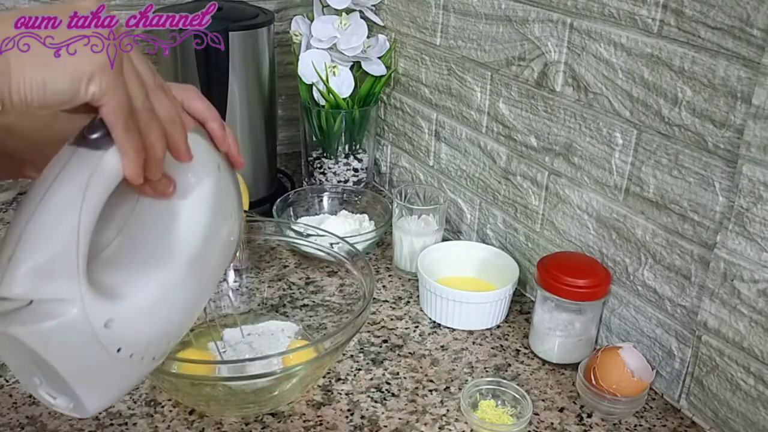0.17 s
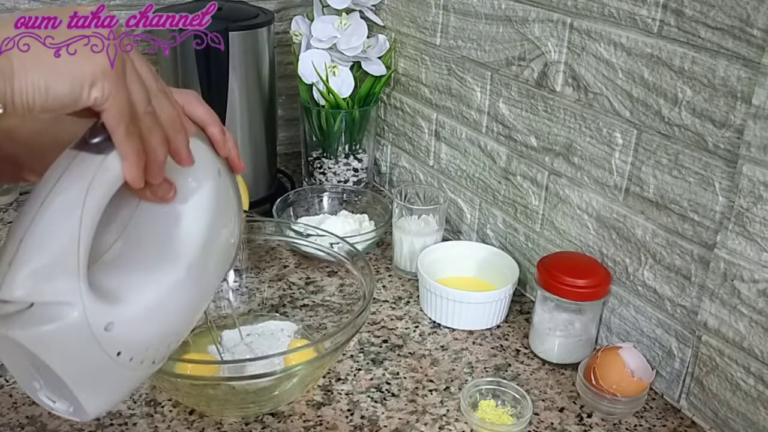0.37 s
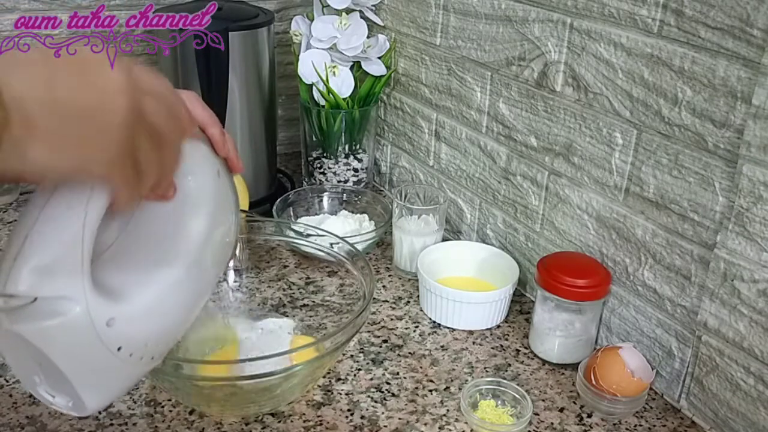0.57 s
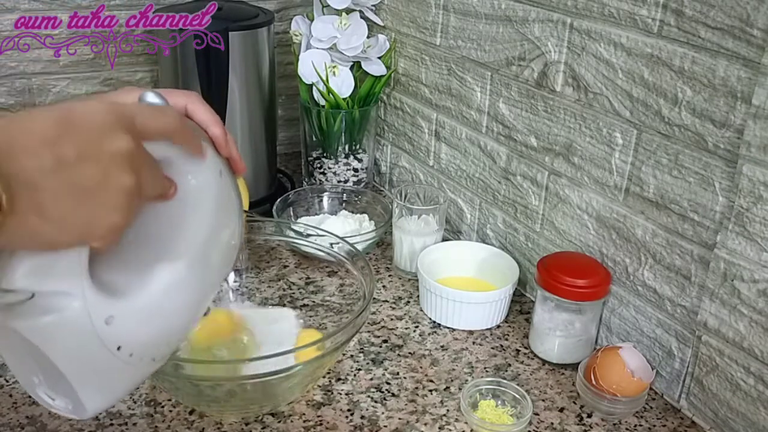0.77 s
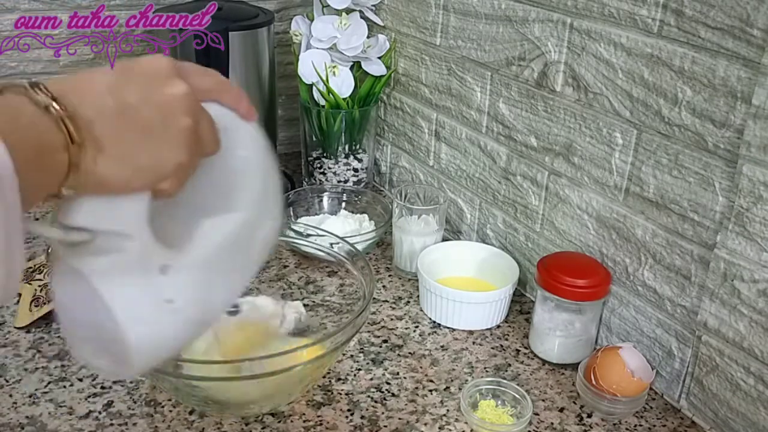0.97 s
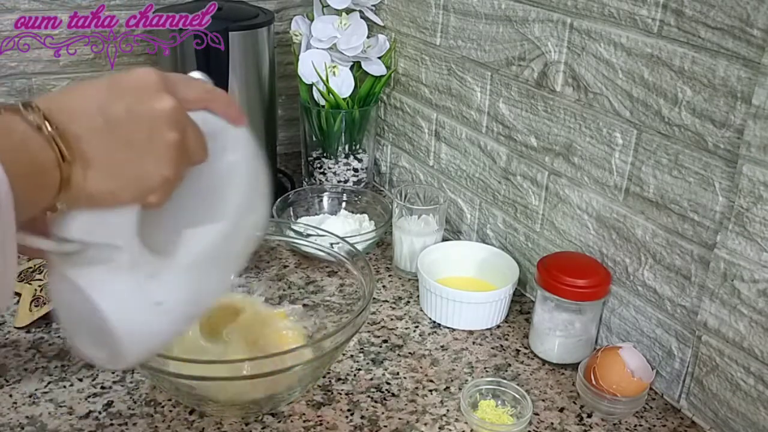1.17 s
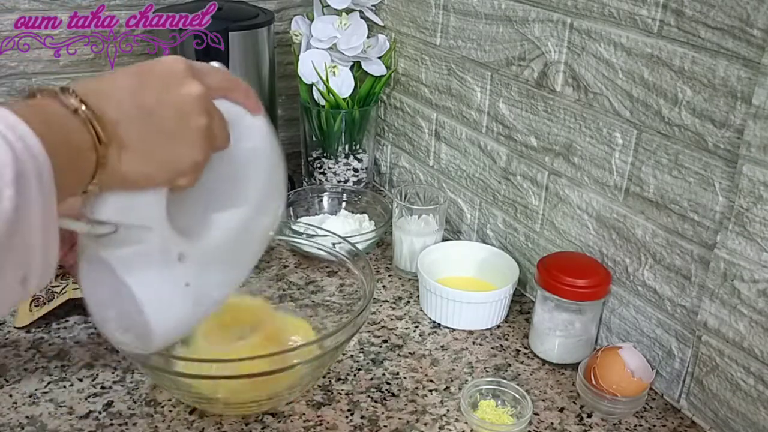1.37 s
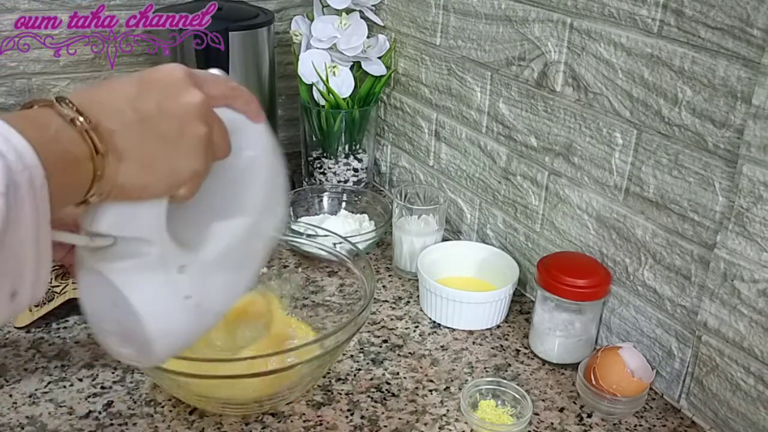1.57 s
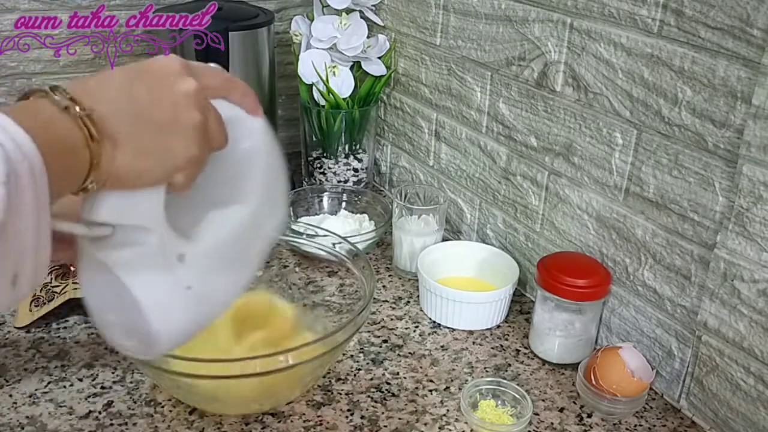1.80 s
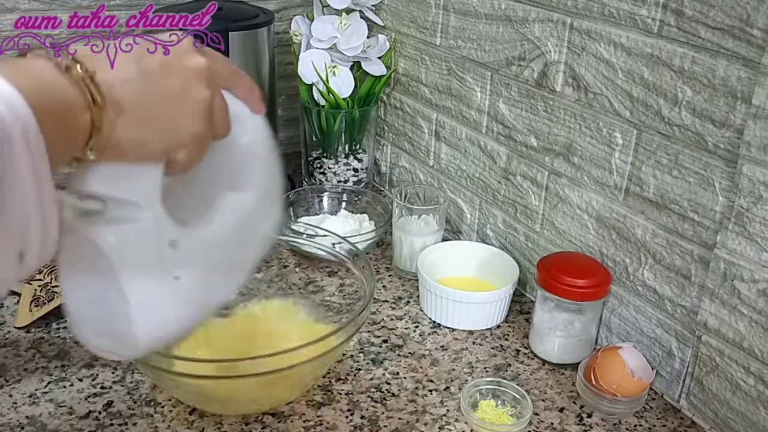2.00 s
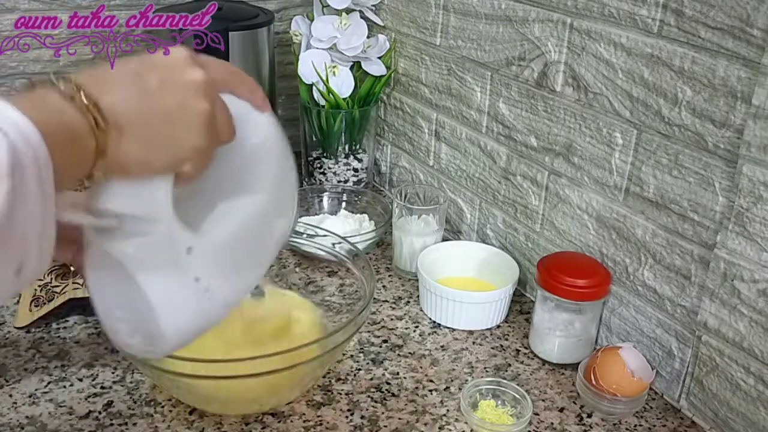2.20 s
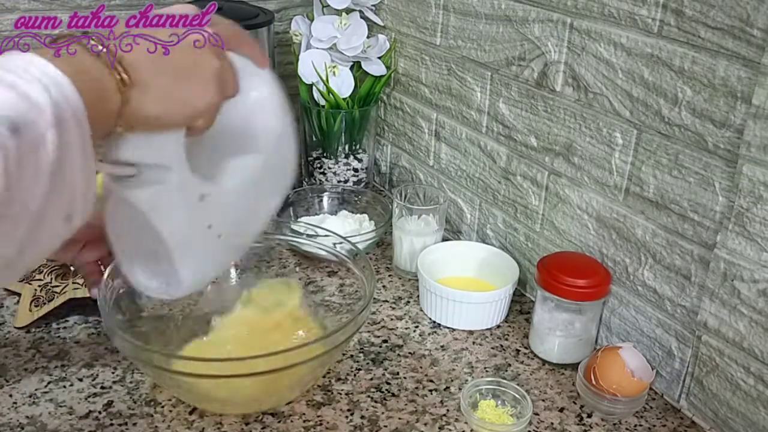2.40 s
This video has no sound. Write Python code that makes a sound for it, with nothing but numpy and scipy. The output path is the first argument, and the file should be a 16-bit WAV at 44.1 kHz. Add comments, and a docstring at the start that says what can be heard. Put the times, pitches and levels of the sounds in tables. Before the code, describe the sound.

An electric hand mixer in a home kitchen: sharp switch clicks with echo, a quick rising throbbing whine and roar, then an abrupt drop to a quieter steady full-speed whir with bright little metallic jingles.

```python
"""A hand mixer's motor spins up with a throbbing whine, then an edit jumps to full speed at a lower level.
The motor is pulsing noise plus tones that follow the shaft speed. Before it, a switch clicks as short
cracks of noise with an echo. Small metal parts jingle as ringing tones: singly at first, then in two bursts
at full speed. A few soft low bumps and the kitchen's room tone and mains hum complete the scene."""
import sys
import numpy as np
from scipy import signal
from scipy.fft import rfft, irfft
from scipy.io import wavfile
from scipy.ndimage import uniform_filter1d

SR = 44100
rng = np.random.default_rng(int(sys.argv[2]) if len(sys.argv) > 2 else 0)


def natural_amplitude(level_db):
    """Convert a level in decibels to a linear amplitude factor, elementwise."""
    exponent = np.asarray(level_db, float) / 20
    return 10 ** exponent


def transcribe(u):
    """Save the signal u as a 16-bit wav file named by the first command-line argument.

    u: samples, shape (n,) or (channels, n), limited to [-1, 1]; the rate is SR.
    q: integer samples, one column per channel.
    """
    v = np.clip(np.atleast_2d(u).T, -1, 1)
    q = np.round(v * 32767).astype(np.int16)
    wavfile.write(sys.argv[1], SR, q)


N = 108045  # length in samples


def evened(x):
    """Scales a sound to an rms of 1."""
    return x / np.sqrt(np.mean(x ** 2) + 1e-20)


def read(points, hz):
    """Reads a curve between its points, along a logarithmic pitch axis."""
    point_hz, value = np.transpose(points)
    return np.interp(np.log(hz + 1), np.log(point_hz + 1), value)


def over_time(table):
    """Turns each column after start_s into a curve with one value per sample."""
    start_s, *columns = np.transpose(table)
    return [np.interp(np.arange(N) / SR, start_s, column) for column in columns]


def add(mix, start_s, sound):
    """Adds a sound to the mix at its start time, cutting off what runs past the end."""
    part = mix[round(start_s * SR):][:len(sound)]
    part += sound[:len(part)]


def drift(per_s):
    """Random wandering of roughly unit size: straight lines between per_s random points a second."""
    return np.interp(np.arange(N) / SR * per_s, np.arange(400), rng.standard_normal(400))


def colour(x, spectrum, patchy_db):
    """Gives x a spectrum whose strength varies in random patches of time and pitch, at an rms of 1."""
    hz, _, z = signal.stft(x, SR, nperseg=1024, noverlap=768)
    patches = rng.standard_normal(z.shape[::-1]).T
    patches = uniform_filter1d(uniform_filter1d(patches, 8, 0), 8, 1)
    z = z * natural_amplitude(read(spectrum, hz)[:, None] + patchy_db * evened(patches))
    return evened(signal.istft(z, SR, nperseg=1024, noverlap=768)[1][:N])


def tint(x, spectrum):
    """Filters x by a fixed spectrum."""
    hz = np.fft.rfftfreq(len(x), 1 / SR)
    return irfft(rfft(x) * natural_amplitude(read(spectrum, hz)), len(x))


# how long the kitchen's echo takes to die by 60 dB: pitch_hz, t60_s
ROOM_DECAY = [(300, 0.62), (1000, 1), (4000, 0.67), (10000, 0.73), (16000, 0.26)]


def room(x):
    """Diffuse echo: a tail of noise in which each pitch dies away at its own speed."""
    hz, t, z = signal.stft(rng.standard_normal(SR), SR, nperseg=256)
    fall_db = -60 * t / read(ROOM_DECAY, hz)[:, None]
    tail = signal.istft(z * natural_amplitude(fall_db), SR, nperseg=256)[1]
    return signal.fftconvolve(x, tail / np.linalg.norm(tail))[:N]


# colour of the room tone: pitch_hz, density_db (dB per Hz, relative)
ROOM_TONE = [(12, -33), (30, -5), (60, -11), (80, -15.5), (130, -11), (290, -18.5), (430, -26),
             (2660, -27.5), (4790, -44.5), (15200, -48.5), (16500, -65)]
# mains hum: pitch_hz, level_db (rms before the edit and before its slow waver)
MAINS_HUM = [(50, -64.5), (100, -60.5)]


def kitchen():
    """Room tone is coloured noise; mains hum is a few low tones of wavering strength."""
    t = np.arange(N) / SR
    air = natural_amplitude(-59) * colour(rng.standard_normal(N), ROOM_TONE, patchy_db=3.3)
    for hz, level_db in MAINS_HUM:
        level = np.sqrt(2) * natural_amplitude(level_db + 3 * drift(13.2))
        air = air + level * np.sin(2 * np.pi * hz * t)
    return air


# soft low bumps as the mixer is moved: start_s, peak_db, pitch_hz, length_s
SOFT_BUMPS = [(.04, -53, 100, 0.039), (1.40, -59, 168, 0.024), (1.478, -68, 215, 0.037),
              (2.31, -60, 224, 0.041), (2.36, -60, 189, 0.017)]


def bumps():
    """Each bump is a few dull cycles that swell and fade under a smooth window."""
    out = np.zeros(N)
    for start_s, peak_db, hz, length_s in SOFT_BUMPS:
        t = np.arange(0, length_s, 1 / SR)
        window = np.sin(np.pi * t / length_s) ** 2
        add(out, start_s, natural_amplitude(peak_db) * window * np.sin(2 * np.pi * hz * t))
    return out


# clicks of the switch: start_s, level_db (relative), brightness_db (treble up and the rest down by this)
SWITCH_CLICKS = [(0.193, -40.5, -4.5), (.2, -10.5, 0), (.205, -19.5, 0), (.351, -20.5, 0), (.372, -38, -11),
                 (0.3798, -26.5, 1.5)]
# colour of the plastic housing: pitch_hz, density_db (dB per Hz, relative)
HOUSING_COLOUR = [(180, -44), (300, -19), (730, -1), (1450, -11.5), (2130, -3.5), (2610, -16), (3470, -6.5),
                  (5100, -28), (5460, -9.5), (6780, -11), (7760, -1), (10900, -17), (14400, 1), (15400, 5),
                  (16500, -28)]
# colour of the kitchen's echo: pitch_hz, density_db (dB per Hz, relative)
ECHO_COLOUR = [(180, -23), (420, -14), (580, -3), (680, -3), (780, 1), (1000, -4.5), (1270, -8), (2060, -3),
               (2740, -9.5), (3410, -5), (4200, -12.5), (8020, -5.5), (11400, -18), (14900, 2), (15700, -2),
               (16500, -41)]


def tilt(x, brightness_db):
    """Raises what lies above 5500 Hz and lowers what lies below it by the same number of dB."""
    dull = signal.sosfiltfilt(signal.butter(4, 5500, fs=SR, output="sos"), x)
    return dull / natural_amplitude(brightness_db) + (x - dull) * natural_amplitude(brightness_db)


def switch():
    """Each click is a short crack of noise in the colour of the plastic housing; the kitchen echoes it."""
    CRACK_T60_S, ECHO_DB = 0.032, 16.5
    t = np.arange(3000) / SR
    cracks, taps = np.zeros(N), np.zeros(N)
    for start_s, level_db, brightness_db in SWITCH_CLICKS:
        noise = tilt(rng.standard_normal(len(t)), brightness_db)
        decay = natural_amplitude(level_db - 60 * t / CRACK_T60_S) / 2
        add(cracks, start_s, decay * evened(tint(noise, HOUSING_COLOUR)))
        # a single tap of the same brightness sets off the echo
        tap = tilt(signal.unit_impulse(128, 64), brightness_db)
        add(taps, start_s, natural_amplitude(level_db) * tap / np.linalg.norm(tap))
    return cracks + natural_amplitude(ECHO_DB) * tint(room(taps), ECHO_COLOUR)


# shaft speed, with a jump at the edit: start_s, turns_hz
SHAFT_SPEED = [(.38, 79), (.404, 102), (.45, 148), (.5, 198), (.53, 218), (.57, 238), (.62, 256), (.7, 279),
               (.8, 301), (.875, 315), (.876, 339), (.96, 357.5), (1.03, 366.5), (1.12, 367.5),
               (1.25, 362.5), (1.65, 361.3), (1.8, 360.5), (1.95, 361.6), (2.1, 359.5), (2.27, 357.2),
               (2.37, 358.5), (2.45, 364)]
# shaft overtones under the roar: multiple (of shaft speed), spin_up_db, running_db (both relative to the roar)
SHAFT_OVERTONES = [(2, -16, -18), (3, -18, -8), (4, -18, -13), (5, -18, -14), (6, -18, -13), (9, -20, -17),
                   (24, -16, -10), (36, -14.5, -25), (48, -18, -34)]


def roar_noise(turn, mains, spectrum):
    """Roar of fan, brushes and gears: churning noise and random ticks, pulsing with mains and shaft."""
    RATTLES_PER_S, CHURNS_PER_S, CHURN_DB = 1500, 70, 1.6
    MAINS_THROB, TURN_THROB = 0.041, 0.25  # depth of each pulse, as a share
    tick_size = natural_amplitude(-np.minimum(rng.exponential(1, N), 3))  # each tick is up to 3 dB down
    ticks = tick_size * (rng.random(N) < RATTLES_PER_S / SR) * rng.choice([-1, 1], N)
    drive = rng.standard_normal(N) + evened(ticks)
    drive = drive * natural_amplitude(CHURN_DB * drift(CHURNS_PER_S))
    pulse = (1 + MAINS_THROB * mains) * (1 + TURN_THROB * np.cos(turn))
    return colour(drive * pulse, spectrum, patchy_db=1)


def motor(roar_db, shaft_db, whine_db, spectrum, overtone_column):
    """Pulsing roar, a tone at shaft speed with overtones, and the whine of 12 slots passing each turn."""
    SLOTS, THROB_HZ, WHINE_THROB = 12, 100, 0.85
    FUZZ_HZ, FUZZ_DB = 120, -16  # width and level (relative to the roar) of the rough band
    hz, = over_time(SHAFT_SPEED)
    turn = 2 * np.pi * np.cumsum(hz) / SR  # shaft angle in radians
    mains = np.cos(2 * np.pi * THROB_HZ * np.arange(N) / SR)
    growth = np.minimum(hz / 300, 1) ** 4  # overtones grow with speed up to 300 turns a second

    body = roar_noise(turn, mains, spectrum)
    for row in SHAFT_OVERTONES:
        level = natural_amplitude(row[overtone_column] + 3.5 * drift(45))
        blur = 0.8 * drift(60)  # random phase in radians
        body = body + level * np.cos(row[0] * turn + blur) * growth
    # a rough band around twice the whine's pitch
    fuzz = signal.lfilter([1], [1, -np.exp(-np.pi * FUZZ_HZ / SR)], rng.standard_normal(N))
    body = body + natural_amplitude(FUZZ_DB) * evened(fuzz) * np.cos(2 * SLOTS * turn) * growth

    shaft = np.sqrt(2) * natural_amplitude(shaft_db + 1.2 * drift(25)) * np.cos(turn)
    whine = np.cos(SLOTS * turn + 1.3 * drift(150))
    whine = whine * natural_amplitude(whine_db + 3.5 * drift(90)) * (1 + WHINE_THROB * mains)
    return natural_amplitude(roar_db) * body + shaft + whine


# levels during spin-up: start_s, roar_db, shaft_db (rms), whine_db (peak, before its throb)
SPIN_UP_LEVELS = [(0.382, -25.5, -70, -38), (.395, -37.5, -81, -32.5), (.41, -40, -68.5, -36.5),
                  (.45, -40, -77, -33.5), (.49, -38, -64.5, -33.5), (.53, -38.5, -62, -32.5),
                  (.56, -38.5, -51.5, -40), (.6, -37, -48, -42.5), (0.659, -36.5, -39, -36.5),
                  (.7, -36, -44, -51), (.8, -34.5, -41.5, -58), (.85, -35, -39, -61), (.87, -35, -40, -49)]
# colour of the roar during spin-up: pitch_hz, density_db (dB per Hz, relative)
SPIN_UP_ROAR = [(70, -48), (120, -19), (300, -18), (405, -11.5), (480, -7), (850, -17), (980, -6),
                (1290, -3), (1540, -8.5), (2000, -5), (2640, -6), (3170, -8), (4700, -23), (8020, -17),
                (10100, -22.5), (15200, -16.5), (16500, -51)]


def spin_up():
    """The motor fades in quickly and gathers speed, with the kitchen's echo behind it."""
    START_S, FADE_S, ECHO_DB = 0.3623, 0.031, -8
    roar_db, shaft_db, whine_db = over_time(SPIN_UP_LEVELS)
    sound = motor(roar_db, shaft_db, whine_db, SPIN_UP_ROAR, overtone_column=1)
    sound = sound * np.clip((np.arange(N) / SR - START_S) / FADE_S, 0, 1)
    return sound + natural_amplitude(ECHO_DB) * room(sound)


# ringing tones of the metal: pitch_hz, level_db (relative), t60_s (time to die by 60 dB)
METAL_MODES = [(6600, -5, .05), (7040, 0, .06), (8560, -4, .04), (9460, -9, .07), (10050, -3, .06),
               (11000, -1, .05), (12280, -5, .08), (13100, -10, .05), (14050, -6, .06), (14750, -5, .045),
               (15300, -8, .04)]
# jingles: start_s, level_db (of the rattle, before the low cut), loudest_hz, length_s (of the rattle)
METAL_JINGLES = [(0.482, -46, 10950, 0.0084), (0.75, -41, 9460, 0.011), (0.896, -60, 8560, 0.021),
                 (1.336, -51.5, 6600, 0.011), (1.36, -58, 15300, .004), (1.379, -53, 10950, 0.0037),
                 (1.384, -43, 8560, 0.0055), (1.403, -45, 10050, 0.0081), (1.418, -47, 7040, .005),
                 (1.424, -47, 7040, 0.004), (1.43, -45, 10050, 0.011), (1.45, -54, 9460, 0.014),
                 (1.477, -41.5, 10950, 0.0098), (1.490, -58, 14050, .006), (1.507, -42, 8560, 0.0043),
                 (2.306, -43, 10050, 0.012), (2.325, -57.5, 10950, .012), (2.329, -46, 7040, 0.011),
                 (2.348, -46, 10050, 0.0054), (2.36, -41.5, 7040, 0.0071), (2.379, -46, 14050, 0.011),
                 (2.403, -38.5, 14050, 0.0033), (2.406, -62, 10950, 0.013)]


def jingles():
    """Each jingle is a short rattle of touches that ring the same metal modes in a new mix, one favoured."""
    TOUCHES_PER_S, FAVOUR_DB, SCATTER_DB = 2200, 6, 2.5
    HISS_DB, ECHO_DB = -27, -19
    t, out = np.arange(4000) / SR, np.zeros(N)
    hz, db, t60_s = np.transpose(METAL_MODES)[:, :, None]
    for start_s, level_db, loudest_hz, length_s in METAL_JINGLES:
        level_chance, tune_chance = rng.standard_normal((2, len(hz), 1))
        touches = rng.standard_normal((len(hz), 1000))
        touches = touches * (rng.random(1000) < TOUCHES_PER_S / SR) * (t[:1000] < length_s)
        touches[:, 0] = 1.5  # every jingle begins with a firm touch
        favoured = abs(hz / loudest_hz - 1) < .03
        mode_db = db + SCATTER_DB * level_chance + FAVOUR_DB * favoured
        mode_hz = hz * (1 + 0.0049 * tune_chance)
        modes = natural_amplitude(mode_db - 60 * t / t60_s) * np.sin(2 * np.pi * mode_hz * t)
        ring = signal.fftconvolve(modes, touches, axes=1).sum(0)
        ring = ring / np.std(ring[:round(length_s * SR) + 100])
        # a bright puff of hiss at the start of the rattle
        hiss = np.diff(rng.standard_normal(len(ring) + 2), 2)
        hiss = hiss * np.exp(-(np.arange(len(ring)) / SR / length_s) ** 2)
        add(out, start_s, natural_amplitude(level_db) * (ring + natural_amplitude(HISS_DB) * hiss))
    out = signal.sosfilt(signal.butter(6, 5900, "high", fs=SR, output="sos"), out)
    return out + natural_amplitude(ECHO_DB) * room(out)


# levels at full speed, after the edit: start_s, roar_db, shaft_db (rms)
FULL_SPEED_LEVELS = [(0.885, -51.5, -60.5), (0.971, -51, -52.5), (1.005, -50, -62), (1.101, -51.5, -55),
                     (1.133, -50.5, -65), (1.315, -50, -57), (1.481, -57, -68), (1.507, -50.5, -61.5),
                     (1.847, -50.5, -56.5), (1.951, -51, -62), (1.987, -50.5, -54), (2.213, -50, -54),
                     (2.283, -52, -54), (2.369, -49, -61), (2.379, -57.5, -60), (2.405, -54.5, -76),
                     (2.435, -50, -63), (2.45, -51, -63)]
# colour of the roar at full speed: pitch_hz, density_db (dB per Hz, relative)
FULL_SPEED_ROAR = [(71, -55), (120, -22.5), (297, -16.5), (358, -13.5), (413, -11), (720, -10),
                   (867, -20.5), (1090, -5), (1210, -8), (1940, -10.5), (2150, -7), (2640, -12.5),
                   (3240, -12), (5000, -23), (6140, -24), (8360, -14), (10100, -25), (15200, -17.5),
                   (16500, -33)]


def full_speed():
    """The motor at full speed, at the lower level after the edit: roar and shaft tones, no slot whine."""
    roar_db, shaft_db = over_time(FULL_SPEED_LEVELS)
    return motor(roar_db, shaft_db, -np.inf, FULL_SPEED_ROAR, overtone_column=2)


def scene():
    """Joins the spin-up to the full-speed stretch with a 1 ms crossfade; jingles and bumps lie over both."""
    CUT_S, CUT_DB = 0.8755, -17  # the level drops at the edit, room tone and hum included
    air = kitchen()
    before = air + switch() + spin_up()
    after = full_speed() + natural_amplitude(CUT_DB) * air
    fade = np.clip((np.arange(N) / SR - CUT_S) / .001, 0, 1)
    mix = (1 - fade) * before + fade * after + jingles() + bumps()
    return np.array([mix, mix])  # the same sound left and right


def roll_off(x):
    """The treble ends steeply here."""
    return signal.sosfilt(signal.butter(12, 16830, fs=SR, output="sos"), x)


def record(dry):
    """The microphone's low cut at 40 Hz, then a steep band limit at 16300 Hz."""
    x = signal.sosfilt(signal.butter(2, 40, "high", fs=SR, output="sos"), dry)
    band_limit = signal.firwin(511, 16300, window=("kaiser", 9), fs=SR)
    x = signal.oaconvolve(x, band_limit[None], "same")
    return roll_off(x)


dry = scene()
out = record(dry)
transcribe(out)
```